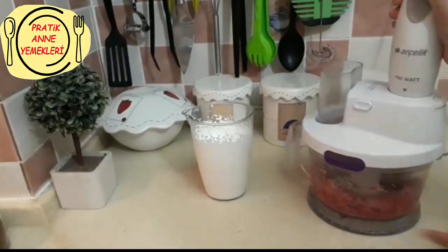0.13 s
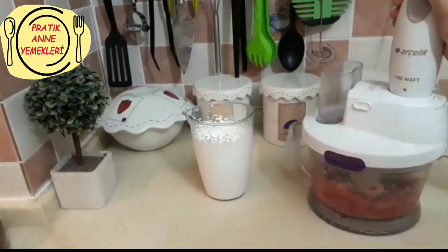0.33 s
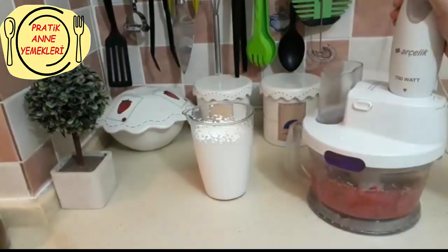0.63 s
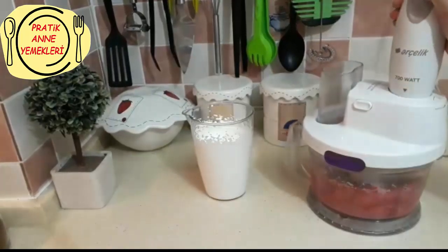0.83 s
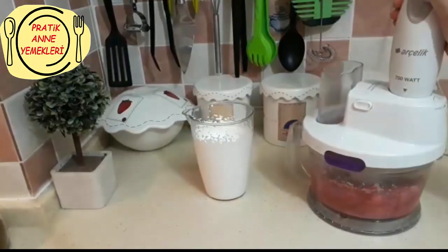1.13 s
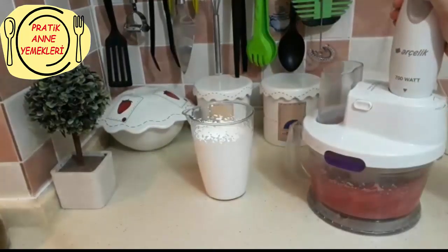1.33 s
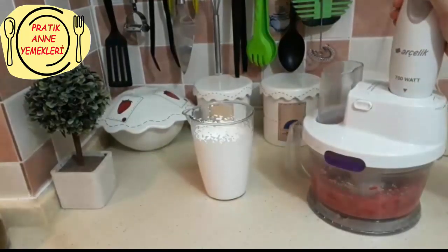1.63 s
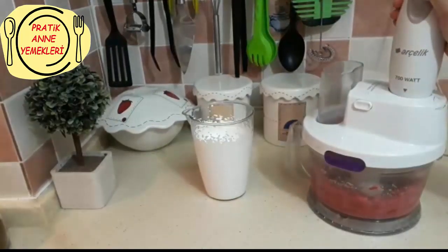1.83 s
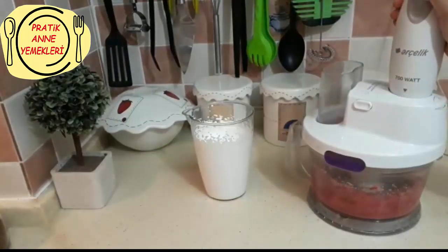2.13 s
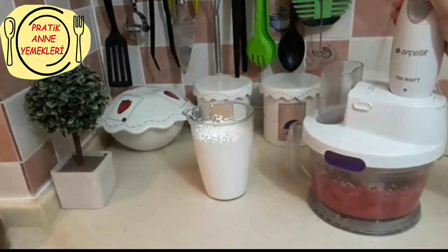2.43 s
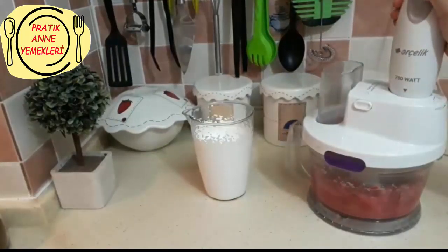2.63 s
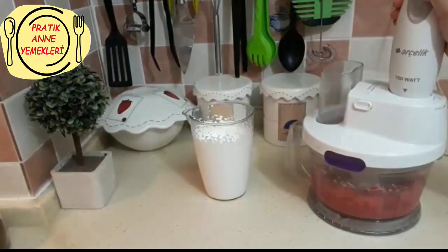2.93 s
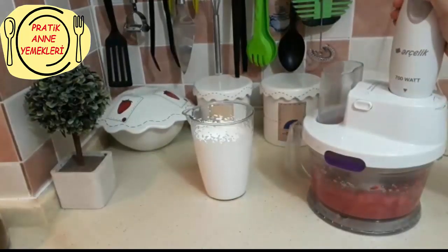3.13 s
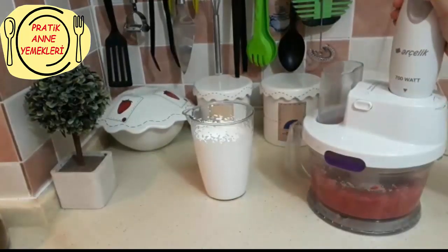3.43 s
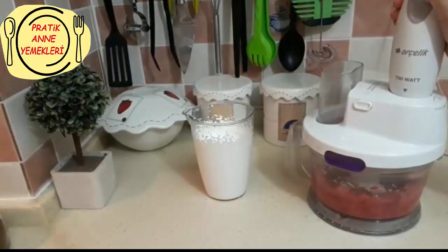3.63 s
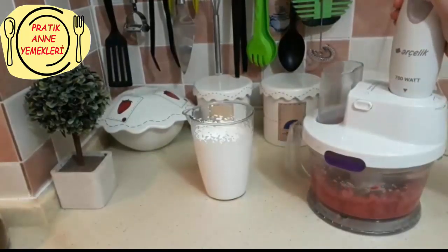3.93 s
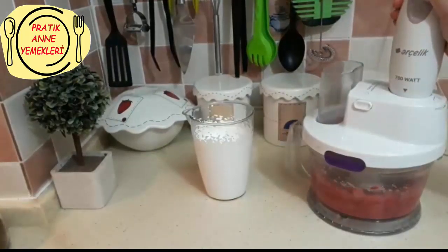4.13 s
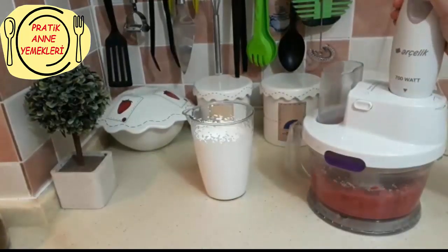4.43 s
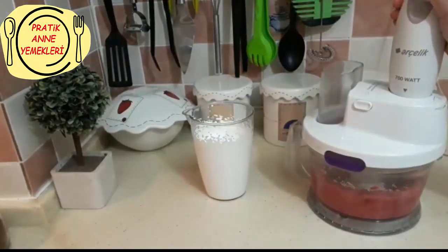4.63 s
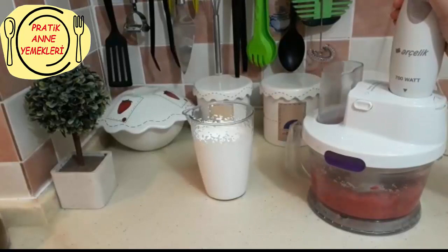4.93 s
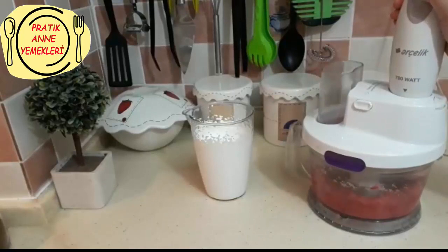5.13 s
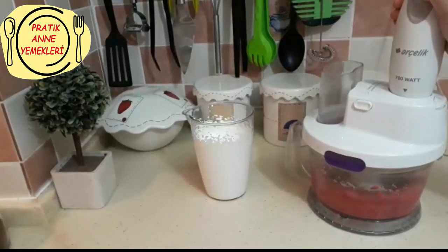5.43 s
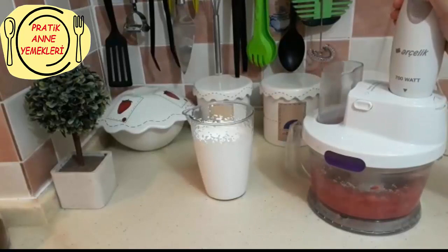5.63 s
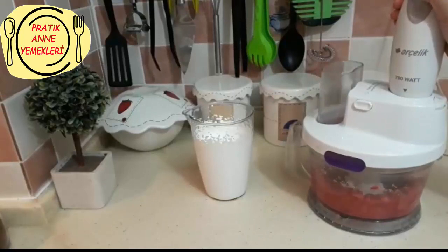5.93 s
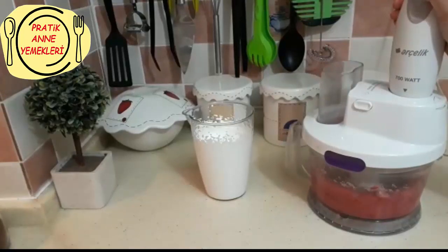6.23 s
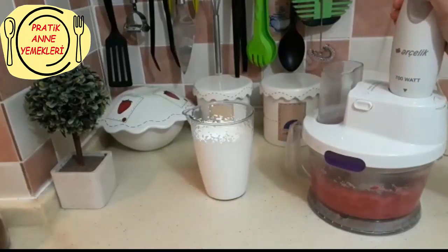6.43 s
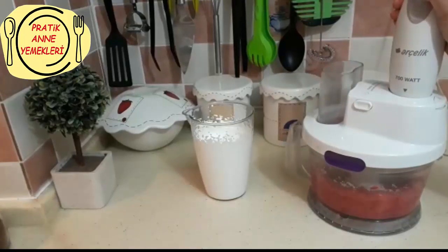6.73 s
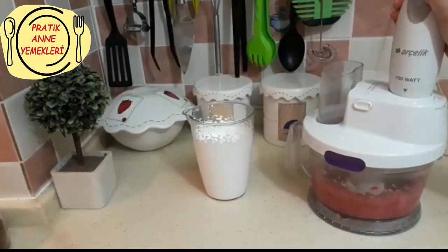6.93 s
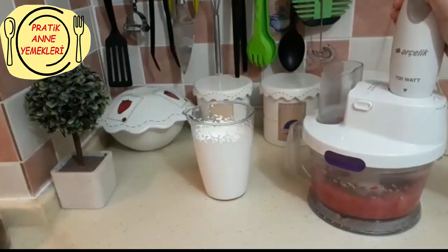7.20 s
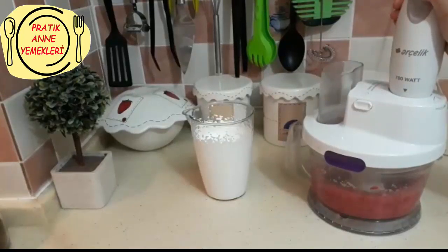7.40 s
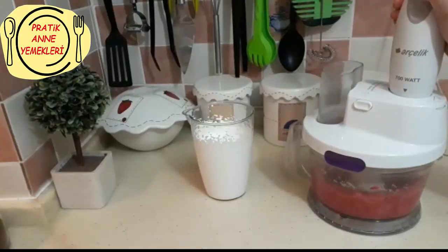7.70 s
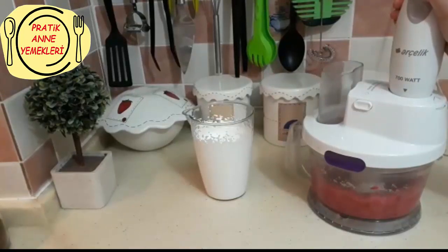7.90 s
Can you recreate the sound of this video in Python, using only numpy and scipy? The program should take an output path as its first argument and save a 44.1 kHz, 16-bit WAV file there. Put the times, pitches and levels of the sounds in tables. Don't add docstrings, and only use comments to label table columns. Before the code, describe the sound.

Close in a small kitchen with short reflections and very faint room tone. At 0-0.2 s a hand brushes a plastic bowl with a light tap and dull bumps. A hand blender motor then fires three short, rough, snagging bursts at about 0.24-0.47, 0.56-0.75 and 0.87-1.07 s, with gear clunks and crunching ice chips. A long grind runs 1.25-3.6 s: wavering nasal whine, mains buzz, bowl rumble, gritty blade noise and airy hiss. It coasts quickly down; a small bump falls near 3.9 s. Smoother presses follow at 4.06-4.98, 5.21-5.74 (a loud opening clunk) and 6.05-6.88 s, the fruit looser and the motor freer. After a pause, short pulses come at 7.37-7.57, 7.66-7.83 and 7.92-8.2 s, the last rougher again. Every release drops in pitch and fades fast, to near silence in the longer gaps.

```python
import sys
import numpy as np
from scipy import signal
from scipy.fft import rfft, irfft, next_fast_len
from scipy.io import wavfile
from scipy.ndimage import uniform_filter1d

SR = 44100
rng = np.random.default_rng(int(sys.argv[2]) if len(sys.argv) > 2 else 0)


def dump_mix(stems):
    frames = np.atleast_2d(stems).T
    limited = np.clip(frames, -1, 1)
    pcm = np.round(limited * 32767).astype(np.int16)
    wavfile.write(sys.argv[1], SR, pcm)


def gain_from_db(level_db):
    decades = np.asarray(level_db, float) / 20
    return 10 ** decades


N = 355534
T = np.arange(N) / SR
HZ = np.fft.rfftfreq(next_fast_len(N // 2 + 1, True) * 2, 1 / SR)

# pitch_hz, level_db (per Hz)
FLOOR_COLOUR = [(18, -53), (30, -24), (103, 3), (149, -6), (194, 6.5), (473, -0.5), (649, -8),
                (1250, -14.5), (13000, -24.5), (16000, -21)]
# pitch_hz, t60_s
KITCHEN_DECAY = [(200, 0.2), (1000, 0.3), (4000, 0.15), (12000, 0.26)]
# middle_s, half_length_s, level_db
HAND_SLIDES = [
    (0.001, .045, -49.5),
    (0.103, 0.12, -65),
    (0.244, 0.039, -56),
]
# start_s, peak_db, pitch_hz, t60_s
HAND_KNOCKS = [
    (.0372, -30, 1700, .14),
    (.064, -38, 250, .06),
    (.114, -39, 300, .12),
    (.139, -40, 250, .05),
    (3.930, -35, 600, .05),
    (3.930, -50, 3000, .03),
]
# on_s, off_s, early_shaft_hz, late_shaft_hz, snagging (0-1)
PRESSES = [
    (0.242, 0.469, 224.9, 232.7, 0.94),
    (0.564, 0.752, 230.3, 247.1, 0.66),
    (0.87, 1.074, 225.8, 235.8, 0.76),
    (1.245, 3.61, 240.6, 249.2, 0.38),
    (4.059, 4.981, 245.1, 250.3, .25),
    (5.211, 5.735, 245.7, 248, 0.2),
    (6.046, 6.881, 247.4, 250.4, 0.11),
    (7.367, 7.574, 244.7, 248.3, .2),
    (7.655, 7.828, 245.2, 248.3, 0.1),
    (7.915, 8.2, 248.6, 246.7, 0.6),
]
# start_s, peak_db, pitch_hz, t60_s
GEAR_CLUNKS = [(0.2653, -20, 1340, 0.05), (0.575, -24, 1370, 0.045), (0.8836, -13, 1020, 0.05),
               (1.2664, -8.5, 1333, 0.037), (4.0647, -42, 1355, 0.048), (5.2328, -3, 1370, 0.041),
               (6.0536, -33, 1690, 0.062), (6.0644, -18, 1093, 0.05), (7.3854, -34, 1109, 0.057),
               (7.662, -6, 1137, 0.05), (7.9222, -6, 1110, 0.05)]
# running_db, snag_db (added by snagging), run_on_s, fall_db_per_s
LAYERS = [
    (-25, -0.5, 0.058, 178),
    (-25.5, 3, 0.11, 168),
    (-28, 0, 0.0054, 129),
    (-33, 1, 0.052, 185),
    (-29, -1.2, 0.01, 150.5),
]
# pitch_hz, width_hz, level_db
CASING = [(101, 20, 6), (265, 40, 7), (305, 20, 5), (367, 25, 4), (494, 25, 3), (611, 30, 6), (1040, 30, 5),
          (1095, 30, 8), (1290, 40, 3), (1372, 35, 7), (1460, 50, 3), (1586, 22, 8), (2232, 22, 7),
          (3080, 24, 8), (3155, 45, 5), (3770, 50, 3), (4430, 100, 3), (5030, 60, 2), (6020, 80, 5),
          (8880, 120, 4), (9200, 200, 4), (10500, 120, 3)]
# pitch_hz, level_db (per Hz)
GRIND_COLOUR = [(18, -53.5), (30, -54.5), (90, -24.5), (153, -21.5), (194, -13), (526, -10), (616, -11.5),
                (684, -12), (1460, -10.5), (1810, -17.5), (2230, -11), (6050, -16), (7870, -18), (8980, -9),
                (16000, -15.5)]
# ripple_multiple, level_db
HUM_LINES = [(1, -15.5), (2, -2.5), (3, -14)]
# shaft_multiple, ripple_multiple (added), driven_db, coasting_db
SHAFT_ORDERS = [(1, 0, -13, -19), (1.5, 0, -21, -24), (2, 0, -23, -23), (2.5, 0, -23, -19),
                (3, 0, -22, -18), (6, -1, -18, -60), (6, 0, -7.5, -7), (6, 1, -11, -60), (9, 0, -13, -24),
                (12, 0, -23, -15), (12, 1, -16, -60), (18, 0, -26, -26), (24, 1, -25, -60),
                (36, -1, -27, -60)]

RIPPLE_HZ = 100
TURNS_PER_BLADE_TURN = 13.8


def evened(x):
    return x / np.sqrt(np.mean(x ** 2) + 1e-20)


def read(points, hz):
    f, value = np.transpose(points)
    return np.interp(np.log(hz + 1), np.log(f + 1), value)


def drift(hz, size=16):
    r = np.exp(-2 * np.pi * hz * size / SR)
    noise = rng.standard_normal(N // size + SR // size)
    slow = signal.lfilter([1], [1, -2 * r, r * r], noise)[SR // size - 1:]
    return np.interp(np.arange(N) / size, np.arange(len(slow)), evened(slow))


def band(lo_hz, hi_hz):
    return np.sqrt(1 / (1 + (lo_hz / (HZ + 1)) ** 8) / (1 + (HZ / hi_hz) ** 8))


def shaped(x, gain):
    return irfft(rfft(x, 2 * len(HZ) - 2) * gain)[:N]


def resonate(x, hz, width_hz):
    turn = np.exp(2j * np.pi * np.cumsum(hz) / SR)
    r = np.exp(-np.pi * width_hz / SR)
    return 2 * (turn * signal.lfilter([(1 - r) ** 2], [1, -2 * r, r * r], x / turn)).real


def knocks(rows, sharpness, trim_db):
    t = T[:SR // 4]
    out = np.zeros(N + SR)
    for (start, db, hz, t60), puff in zip(rows, rng.standard_normal((len(rows), len(t)))):
        ring = signal.lfilter(*signal.iirpeak(hz, sharpness, SR), puff)
        out[round(start * SR):][:len(t)] += gain_from_db(db + trim_db - 60 * t / t60) * evened(ring)
    return out[:N]


def room_floor():
    tone = evened(shaped(rng.standard_normal(N), gain_from_db(read(FLOOR_COLOUR, HZ))))
    return tone * gain_from_db(-65.5 + 1.1 * drift(6.))


def kitchen(x):
    taps = np.zeros(SR // 2)
    at = np.arange(200, len(taps) - 20, 20)
    taps[at + rng.integers(0, 20, len(at))] = rng.choice([-1., 1.], len(at))
    hz, t, z = signal.stft(taps, SR, nperseg=256)
    decay = gain_from_db(-60 * t / read(KITCHEN_DECAY, hz)[:, None])
    tail = signal.istft(z * decay, SR, nperseg=256)[1]
    return signal.fftconvolve(x, tail / np.linalg.norm(tail))[:N]


def handling():
    swell = sum(gain_from_db(db) * np.exp(-((T - s) / half) ** 2) for s, half, db in HAND_SLIDES)
    bumps = knocks(HAND_KNOCKS, 1.8, -12.5)
    hiss = swell * evened(shaped(rng.standard_normal(N), band(1200, 12000)))
    rub = evened(shaped(rng.standard_normal(N), band(130, 700)))
    return bumps + hiss + gain_from_db(-67) * (T < PRESSES[0][1]) * rub


def levels():
    switch_s, slack_db = 0.0022, -20.5
    knee_s, drag = 0.011, 1.52
    db = np.full((len(LAYERS), N), -120.)
    running_db, snag_db, run_on, fall = np.transpose(LAYERS)[:, :, None]
    for on, off, _, _, snag in PRESSES:
        bite = max(s for s, *_ in GEAR_CLUNKS if s < on + .03)
        span = slice(round(on * SR), round((off + .6) * SR))
        t = T[span]
        closed = on + min(switch_s, (bite - on) / 2)
        rise = np.interp(t, [on, closed, bite], [-60, slack_db, 0])
        late = t - off - run_on * max(1 - drag * snag ** 2, 0)
        drop = fall * knee_s * np.logaddexp(0, late / knee_s)
        db[:, span] = np.maximum(db[:, span], running_db + snag_db * snag + rise - drop)
    return gain_from_db(db)


def shaft():
    spin_up_s, coast_s = .055, .155
    hz, current, snag = np.full(N, 150.), np.zeros(N), np.zeros(N)
    for (on, off, early, late, rough), (_, last_off, *_) in zip(PRESSES, PRESSES[-1:] + PRESSES):
        start = .72 if 0 < on - last_off < .09 else .87
        spin = 1 - (1 - start) * np.exp(-np.maximum(T - on, 0) / spin_up_s)
        top = np.interp(T, [on, off], [early, late]) * spin
        hz = np.where(T >= on, top * np.exp(-np.maximum(T - off, 0) / coast_s), hz)
        current = np.where(T >= on, T < off, current)
        snag = np.where(T >= on, rough, snag)
    snag = snag + 0.755 * (1 - current)
    wander = .02 * drift(10.) + .008 * drift(60.)
    return hz * (1 + snag * wander), uniform_filter1d(current, 400), snag


def casing(hz):
    return np.sqrt(1 + sum((gain_from_db(2 * db) - 1) / (1 + (2 * (hz - f) / w) ** 2) for f, w, db in CASING))


def hum(current, rumble):
    out = np.zeros(N)
    for k, db in HUM_LINES:
        swell = gain_from_db(db + 3.3 * drift(25.0))
        out += swell * np.cos(2 * np.pi * (k * RIPPLE_HZ * T + 0.063 * drift(17.0)))
    return current * rumble * out


def gear_clunks():
    return knocks(GEAR_CLUNKS, 0.56, -11.5)


def mesh(hz, gearbox, grind):
    noise, body = rng.standard_normal(N), casing(HZ)
    floored_hz = np.maximum(hz, 90)
    low = shaped(evened(resonate(noise, 6 * floored_hz, 140)), body)
    high = shaped(evened(resonate(noise, 12 * floored_hz, 330)), body)
    return gearbox * gain_from_db(-12.0) * low + grind * gain_from_db(-14.5) * high


def whine(hz, current, gearbox, grind):
    freed_db = 5.5
    turns, out = np.cumsum(hz) / SR, np.zeros(N)
    for k, m, driven_db, coasting_db in SHAFT_ORDERS:
        line_hz = k * hz + m * RIPPLE_HZ
        level = current * gain_from_db(driven_db) + (1 - current) * gain_from_db(coasting_db + freed_db * (k > 5))
        if k > 5:
            level = level / (1 + (max(1040 / k, 150) / hz) ** 28)
        if m:
            level = level * (1 + 0.27 * np.cos(2 * np.pi * turns / TURNS_PER_BLADE_TURN))
        waver = gain_from_db((2 + .7 * (1 - current)) * drift(25.)) * casing(line_hz) ** .7
        tone = np.cos(2 * np.pi * (k * turns + m * RIPPLE_HZ * T + .05 * drift(15.)))
        out += (grind if k > 6 else gearbox) * level * waver * tone
    return out + gain_from_db(-3.0) * kitchen(out)


def grinding(current, snag, grind, gearbox, rumble, air, low_middle):
    chip_size = gain_from_db(3.4 * np.minimum(rng.exponential(1, N), 4))
    chips = chip_size * (rng.random(N) < 1500 / SR) * rng.choice([-1, 1], N)
    drive = rng.standard_normal(N) + 0.52 * (0.44 + snag) * chips
    drive += gain_from_db(-6) * kitchen(drive)
    drive *= gain_from_db(.5 * current * np.cos(2 * np.pi * RIPPLE_HZ * T) + .6 * drift(40.))
    colour = gain_from_db(read(GRIND_COLOUR, HZ)) * casing(HZ)
    loose = evened(shaped(drive, colour / casing(HZ) ** 0.23 * band(1100, 1500)))
    edges = (20, 140), (140, 330), (330, 900), (900, 1700), (1700, 6000), (6000, 18000)
    thud, bowl, slosh, gears, blades, fan = (evened(shaped(drive, colour * band(*e))) for e in edges)
    body = low_middle * (gain_from_db(-16.0) * thud + gain_from_db(-3.5 - 1.0 * current) * slosh)
    driven = gain_from_db(-6.0 + 5.8 * snag) * current * gears
    coasting = gain_from_db(-6.0) * (1 - current) * loose
    out = body + rumble * gain_from_db(-6.0) * bowl + gearbox * (driven + coasting)
    return out + grind * gain_from_db(0.35) * blades + air * gain_from_db(-6.0) * fan


def scene():
    grind, gearbox, rumble, air, low_middle = levels()
    hz, current, snag = shaft()
    background = room_floor() + handling()
    motor = hum(current, rumble) + gear_clunks() + mesh(hz, gearbox, grind)
    motor = motor + whine(hz, current, gearbox, grind)
    fruit = grinding(current, snag, grind, gearbox, rumble, air, low_middle)
    return (background + motor + fruit)[None]


def roll_off(x):
    return signal.sosfilt(signal.butter(12, 16440, fs=SR, output="sos"), x)


def record(dry):
    ceiling, edge_hz = .6, 15780
    soft = ceiling * np.tanh(dry / ceiling)
    low_pass = signal.firwin(1023, edge_hz, window=("kaiser", 10), fs=SR)
    mix = signal.oaconvolve(soft, low_pass[None], "same")
    return roll_off(mix)


dry = scene()
out = record(dry)
dump_mix(out)
```